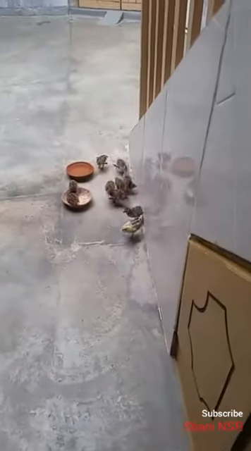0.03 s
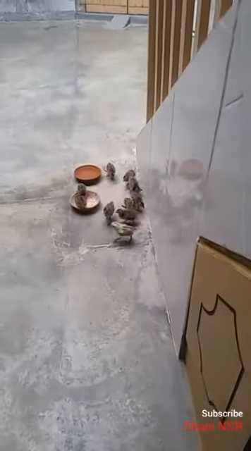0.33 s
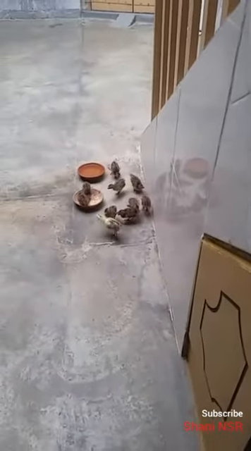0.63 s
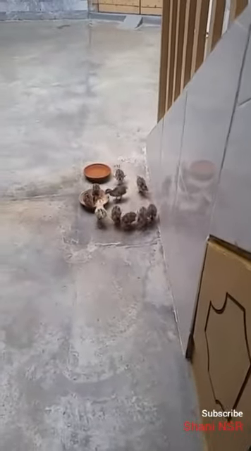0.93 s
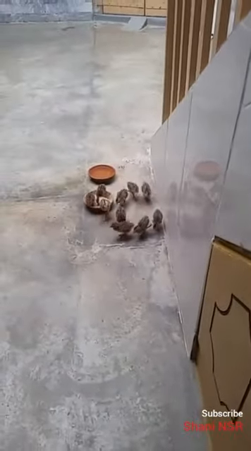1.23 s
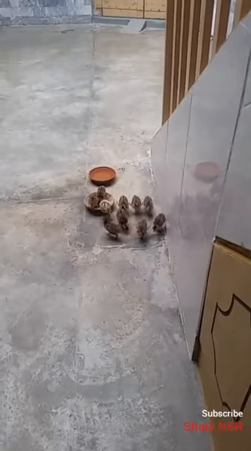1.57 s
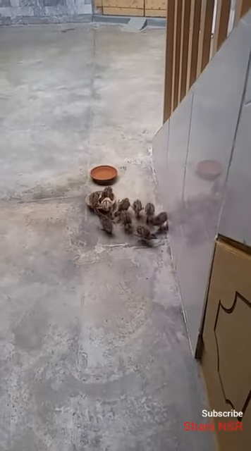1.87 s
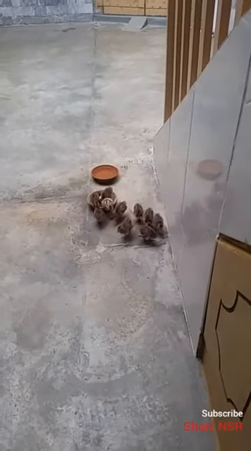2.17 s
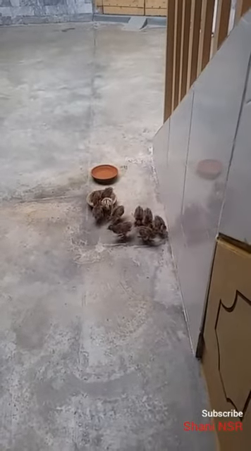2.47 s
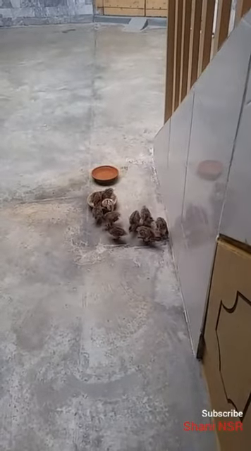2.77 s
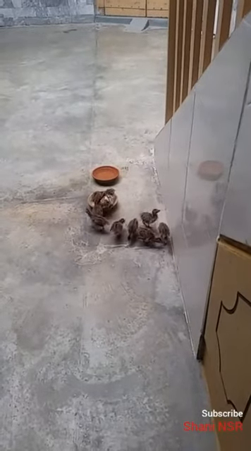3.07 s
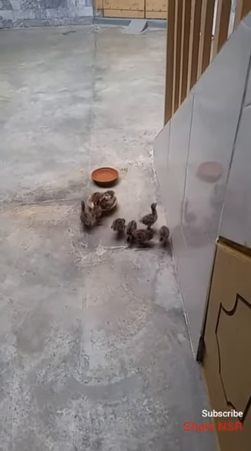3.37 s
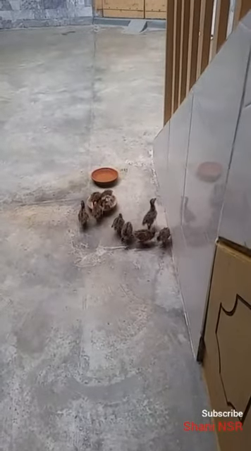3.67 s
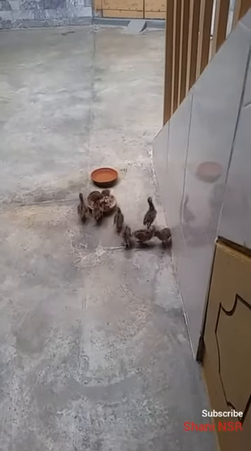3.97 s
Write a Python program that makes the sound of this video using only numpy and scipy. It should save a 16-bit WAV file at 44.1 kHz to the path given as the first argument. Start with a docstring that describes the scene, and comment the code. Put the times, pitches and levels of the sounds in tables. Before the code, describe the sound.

Something dry scrapes over a concrete floor in short, gritty strokes, close on the right: once at 0.4 seconds, again at 1, then repeatedly and a little louder from 1.4 to 4 seconds. Chicks give short, mostly falling peeps that echo in the room until about 2.3 seconds. Underneath are a wash of distant chicks, a low outdoor rumble, faint hum and three soft bumps.

```python
"""An echoing room with a bare concrete floor, where chicks run about and peep. Each peep is a
short, nearly pure tone, mostly falling in pitch, followed by its reverberation. Close on the right,
something dry is scraped over the floor: stick-slip friction makes quick gritty strokes, coloured
by the object's resonances. Underneath lie a wash of far chicks, a low outdoor rumble, a faint
wavering hum, thin hiss and three soft bumps."""
import sys
import numpy as np
from scipy import signal
from scipy.fft import rfft, irfft, next_fast_len
from scipy.io import wavfile
from scipy.ndimage import map_coordinates

SR = 44100
rng = np.random.default_rng(int(sys.argv[2]) if len(sys.argv) > 2 else 0)


def transcribe(signal):
    """Save signal, clipped to [-1, 1], as a 16-bit WAV file at the path in sys.argv[1]."""
    frames = np.atleast_2d(signal).T
    limited = np.clip(frames, -1, 1)
    pcm = np.round(limited * 32767).astype(np.int16)
    wavfile.write(sys.argv[1], SR, pcm)


N = 176400
TIME = np.arange(N) / SR

# chick calls: start_s, length_s, first_pitch_hz, last_pitch_hz, level_db, room_db, waver_fraction
PEEPS = [(-.03, 0.152, 2462, 2367, -33.5, 7, 0.022), (.14, .15, 2357, 2500, -37, -2, .02),
         (0.193, 0.075, 3930, 2980, -26.5, 5, 0.017), (.225, 0.082, 3580, 3430, -30, -12, 0.007),
         (.282, 0.024, 3470, 2930, -25, -1, 0.0092), (0.272, 0.045, 2740, 2630, -28, 4, 0.011),
         (0.336, .08, 5350, 4570, -36, 5, 0.056), (0.391, .13, 4190, 3255, -22.5, 1.5, .08),
         (.355, 0.11, 2524, 2228, -26, 5.5, .07), (0.514, .1, 1793, 1501, -38, 6, 0.092),
         (.638, 0.077, 2700, 2515, -22.5, 3, 0.042), (0.633, .08, 3450, 3240, -27, 3, 0.044),
         (.745, .11, 2603, 2244, -24.5, 5.5, 0.065), (0.816, .115, 3390, 2943, -24.5, -4, 0.017),
         (0.868, .10, 2550, 2150, -27.5, 0, .065), (.92, 0.071, 2550, 2473, -27.5, 1, 0.0091),
         (1.17, .06, 2506, 2480, -25, 0.5, .02), (1.20, .07, 3480, 3150, -35, -8, .05),
         (1.25, 0.096, 2520, 2434, -34.5, 2, .035), (1.37, 0.068, 3135, 3020, -33.5, -8, 0.03),
         (1.433, .17, 2168, 1541, -35, 1, 0.071), (1.45, 0.04, 2400, 2280, -30, -4, 0.017),
         (1.48, 0.11, 3370, 3010, -27, 6, 0.0402), (1.747, .04, 3045, 2706, -25.5, -2, 0.063),
         (1.801, 0.1, 2747, 2488, -25.5, 2, 0.092), (1.757, 0.0743, 1617, 1340, -36.5, 0, 0.083),
         (1.84, .16, 2147, 1850, -35.5, 0, 0.069), (2.0, .27, 1492, 1291, -36, 7, 0.042),
         (1.992, 0.153, 2927, 2827, -28, 4, 0.033), (2.149, .12, 2670, 2420, -25, 6, 0.062)]
# scraping strokes: start_s, length_s, relative_level_db, tilt_db_per_octave, fizz_db
STROKES = [(0.396, .17, -22, -0.5, 0.5), (1.024, 0.085, -27, -4, -2.5), (1.413, 0.14, -25, 4.5, 3.5),
           (1.553, 0.15, -20, -1, 1.5), (1.754, 0.11, -18.5, 0.5, 2), (2.097, 0.14, -20, 5.5, 4.5),
           (2.266, .17, -20.5, 5, 1.5), (2.41, 0.098, -18, -1, 0.5), (2.608, 0.15, -17, -2, 0.5),
           (2.815, .11, -17, -0.5, 1.5), (2.919, 0.12, -20, 6, 6.5), (3.004, 0.1, -16.5, 0.5, -1),
           (3.191, 0.12, -18, 3.5, 1.5), (3.313, 0.19, -19, -0.5, 0), (3.663, .155, -16.5, -1, -0.5),
           (3.848, 0.2, -19.5, 1, -4.5)]
SCRAPE_SPECTRUM = [(530, -70), (900, -34), (944, -49.5), (1160, -37), (1350, -20.5), (1780, -23),
                   (2030, -9), (2350, -10), (2580, -2), (3980, -0.5), (4650, -2), (5980, -3.5),
                   (6910, -10.5), (8780, -35), (10800, -28.5), (14400, -26.5), (15800, -26.5)]  # friction noise: frequency_hz, gain_db
SCRAPE_PAN = [(60, -21), (120, -21), (240, -0.5), (480, -17), (950, 9.5), (1890, -8), (3770, -17),
              (7520, -8), (15000, 9.5)]  # its stereo balance: frequency_hz, left_minus_right_db
RESONANCES = [2480, 2876, 3135, 3200, 3517, 3690, 3930, 4047, 4185, 4706, 5170, 5520, 5740, 5910, 6663]  # modes of the scraped object: frequency_hz
CHATTER_SPECTRUM = [(700, -41), (1100, -18.5), (1400, -9), (1800, -10), (2100, -5.5), (2450, -7.5),
                    (2900, -3.5), (4000, -9), (4800, -17), (6000, -25), (7000, -33.5), (8000, -64),
                    (10000, -84)]  # far chicks and shuffling feet: frequency_hz, gain_db
CHATTER_LEVEL = [(0, -34), (.17, -38.5), (.32, -37.5), (.6, -34), (1.2, -34.5), (2.2, -28.5), (2.7, -32.5),
                 (4, -36)]  # their envelope: time_s, level_db
BUMPS = [(.64, 0.18, -36.5), (2.26, .14, -42), (3.65, 0.22, -45)]  # soft low bumps: start_s, length_s, level_db
BUMP_SPECTRUM = [(25, -25), (60, 3.5), (100, -2.5), (170, -2.5), (300, -23), (1000, -70), (4000, -110)]  # their colour: frequency_hz, gain_db
RUMBLE_SPECTRUM = [(20, -22), (32, -11), (48, -12), (80, -3.5), (150, -0.5), (260, -5.5), (400, -8.5),
                   (700, -10.5), (1200, -14), (2500, -12.5), (5000, -40), (8000, -70)]  # outdoor noise: frequency_hz, gain_db
RUMBLE_LEVEL = [(0, -35.5), (.74, -34), (1, -35), (1.6, -35), (2.3, -34), (2.8, -37.5), (3.3, -36),
                (4, -35.5)]  # its envelope: time_s, relative_level_db
RUMBLE_COHERENCE = [(50, 0.99), (160, 1), (350, 0.84), (700, 0.4), (1500, 0.044)]  # its left-right likeness: frequency_hz, correlation
GLIDING_HUM = [(0, 237, -39), (.2, 222, -44.5), (.42, 222, -39.5), (.53, 218, -47), (.65, 218, -37),
               (.8, 241, -46), (.95, 253, -44.5), (1.15, 222, -47.5), (1.5, 220, -82)]  # upper hum tone: time_s, pitch_hz, level_db
LOW_HUM = [(0, -43.5), (1.3, -50.5), (1.7, -56.5), (2.5, -40), (3.2, -55), (4, -42.5)]  # lower hum tone: time_s, level_db
HISS_SPECTRUM = [(6000, -37), (9500, -37), (12000, -22), (15000, -9.5)]  # thin treble noise: frequency_hz, gain_db
REVERB_TIME = [(300, .9), (2500, 1), (4500, 1), (7000, 0.86), (11000, 0.61), (16000, .45)]  # the room's time to decay by 60 dB: frequency_hz, decay_s


def amp(db):
    """Amplitude ratio of a level in decibels."""
    return 10 ** (np.asarray(db) / 20)


def unit(x):
    """Normalisation to rms 1."""
    return x / np.sqrt(np.mean(x ** 2) + 1e-20)


def along(points, hz):
    """Interpolation of (frequency_hz, value) points on a logarithmic frequency axis."""
    frequencies, values = np.transpose(points)
    return np.interp(np.log(hz + 1), np.log(frequencies + 1), values)


def curves(rows):
    """Linear interpolation in time: one value per sample for each column after time_s."""
    times, *columns = np.transpose(rows)
    return [np.interp(TIME, times, column) for column in columns]


def wobble(position, knots=4096):
    """Smooth random modulation: a spline through Gaussian values, one per unit of position."""
    return map_coordinates(rng.standard_normal(knots), [position], mode="mirror")


def filtered(x, response):
    """Linear filtering: the spectrum of x times a frequency response."""
    n = x.shape[-1]
    padded = next_fast_len(n + 4096)
    return irfft(rfft(x, padded) * response(np.fft.rfftfreq(padded, 1 / SR)), padded)[..., :n]


def pan(left_minus_right_db):
    """Direction by level difference: left and right gains of mean power 1."""
    gains = amp(np.array([[.5], [-.5]]) * left_minus_right_db)
    return gains / np.sqrt(np.mean(gains ** 2, axis=0))


def noise(spectrum):
    """Spectral shaping of white noise: two uncorrelated channels of rms 1."""
    return unit(filtered(rng.standard_normal((2, N)), lambda hz: amp(along(spectrum, hz))))


def add(out, x, start_s):
    """Superposition of x on out, from start_s on."""
    i = round(start_s * SR)
    x = x[:, max(-i, 0):max(N - i, 0)]
    out[:, max(i, 0):][:, :x.shape[1]] += x


def hump(length_s, power):
    """Progress 0-1 through an event, and its envelope: a half sine raised to a power."""
    progress = np.linspace(0, 1, max(int(length_s * SR), 8))
    return progress, np.abs(np.sin(np.pi * progress)) ** power


def in_room(x, room_db):
    """Reverberation: a diffuse, exponentially decaying tail, room_db relative to the direct sound."""
    hz, t, spectra = signal.stft(rng.standard_normal((2, SR)), SR, nperseg=256)
    decay = amp(-60 * t / along(REVERB_TIME, hz)[:, None])
    decay /= np.linalg.norm(decay, axis=1, keepdims=True)  # equal energy in every band
    tail = signal.istft(spectra * decay, SR, nperseg=256)[1]
    response = amp(room_db) * tail / np.linalg.norm(tail[0])
    response[:, 0] += 1  # direct path
    return signal.fftconvolve(np.atleast_2d(x), response, axes=1) / np.hypot(1, amp(room_db))


def peeps(waver_per_s=420):
    """Frequency modulation: each call is a gliding, wavering sine; far ones are mostly reverberation."""
    out = np.zeros((2, N))
    for start_s, length_s, first_hz, last_hz, level_db, room_db, waver_fraction in PEEPS:
        progress, swell = hump(length_s, power=0.3)
        glide_hz = first_hz + (last_hz - first_hz) * progress ** .75
        waver = 1 + waver_fraction * wobble(progress * length_s * waver_per_s, knots=256)
        phase = 2 * np.pi * np.cumsum(glide_hz * waver) / SR
        whistle = unit(swell * np.sin(phase))
        add(out, amp(level_db) * in_room(whistle, room_db), start_s)
    return out * pan(-13.5)


def scrape_response(hz, tilt_db_per_octave, fizz_db, peak_db=3, half_width_hz=22.5, fizz_hz=8600):
    """Resonance: the object's modes raise narrow peaks on a spectrum that varies by stroke."""
    tilt = tilt_db_per_octave * np.log2(np.clip(hz, 2000, 7000) / 4000)
    fizz = fizz_db * (1 + np.tanh((hz - fizz_hz) / 1500)) / 2  # treble shelf
    peaks = peak_db * sum(1 / (1 + ((hz - mode_hz) / half_width_hz) ** 2) for mode_hz in RESONANCES)
    ripple = 1.85 * wobble(hz / 89.83, knots=512)  # uneven colour, new for each stroke
    return unit(amp(along(SCRAPE_SPECTRUM, hz) + tilt + fizz + peaks + ripple))


def scraping(slips_per_s=6000, catches_per_s=150, catch_db=2.5, gain_db=3.5):
    """Stick-slip friction: each stroke is a swell of tiny impulses, catching unevenly on the floor."""
    out = np.zeros((2, N))
    for start_s, length_s, level_db, tilt_db_per_octave, fizz_db in STROKES:
        progress, swell = hump(length_s, power=1.02)
        sizes = amp(0.5 * np.minimum(rng.exponential(size=(2, SR)), np.pi))
        slipping = rng.random((2, SR)) < slips_per_s / SR
        slips = slipping * np.sign(rng.standard_normal((2, SR))) * sizes
        catch = amp(catch_db * np.tanh(wobble(progress * length_s * catches_per_s, knots=256)))
        friction = unit(slips[:, :len(swell)] * catch) * swell
        echoing = in_room(friction, room_db=4.5)
        stroke = filtered(echoing, lambda hz: scrape_response(hz, tilt_db_per_octave, fizz_db))
        add(out, amp(level_db + gain_db) * stroke, start_s)
    return filtered(out, lambda hz: pan(along(SCRAPE_PAN, hz)))


def chatter(flutter_db=1.3, flutter_per_s=26):
    """Incoherent summation: far peeps and small feet merge, modelled as one restless band of noise."""
    level_db, = curves(CHATTER_LEVEL)
    wash = noise(CHATTER_SPECTRUM)
    return wash * amp(level_db + flutter_db * wobble(TIME * flutter_per_s)) * pan(-13.5)


def bumps():
    """Amplitude envelopes on bass noise: dull swells, in phase in both channels."""
    out = np.zeros((2, N))
    for start_s, length_s, level_db in BUMPS:
        _, swell = hump(length_s, power=1)
        bass = noise(BUMP_SPECTRUM)[:1, :len(swell)]
        add(out, amp(level_db) * unit(bass * swell), start_s)
    return out


def rumble(gain_db=-1):
    """Spatial coherence: outdoor noise is alike left and right at long wavelengths, unlike at short."""
    first, second = noise(RUMBLE_SPECTRUM)
    angle = lambda hz: np.arccos(np.clip(along(RUMBLE_COHERENCE, hz), -1, 1)) / 2
    mid = filtered(first, lambda hz: np.cos(angle(hz)))
    side = filtered(second, lambda hz: np.sin(angle(hz)))
    level_db, = curves(RUMBLE_LEVEL)
    return np.array([mid + side, mid - side]) * amp(level_db + gain_db)


def hum(low_hz=153, waver_db=1.9, waver_fraction=0.0069):
    """Random amplitude and frequency modulation: two faint tones waver, and the upper one glides."""
    out = np.zeros(N)
    for pitch_hz, level_db in [curves(GLIDING_HUM), (low_hz, *curves(LOW_HUM))]:
        envelope = amp(level_db + waver_db * wobble(TIME * 8.45))
        wavering_hz = pitch_hz * (1 + waver_fraction * wobble(TIME * 12))
        out += envelope * unit(np.sin(2 * np.pi * np.cumsum(wavering_hz) / SR))
    return out


def hiss(level_db=-54):
    """Stationary noise in the top of the treble, toward the left."""
    return amp(level_db) * noise(HISS_SPECTRUM) * pan(6)


def scene():
    """Superposition: the sound pressures of all sources add."""
    return peeps() + scraping() + chatter() + bumps() + (rumble() + hum()) * pan(-1) + hiss()


def record(dry, ceiling=.8, cutoff_hz=15850):
    """Soft saturation rounds the tallest peaks; a low-pass filter limits the bandwidth."""
    rounded = dry / (1 + np.abs(dry / ceiling) ** 10) ** (1 / 10)
    return filtered(rounded, lambda hz: hz < cutoff_hz)


dry = scene()
out = record(dry)
transcribe(out)
```